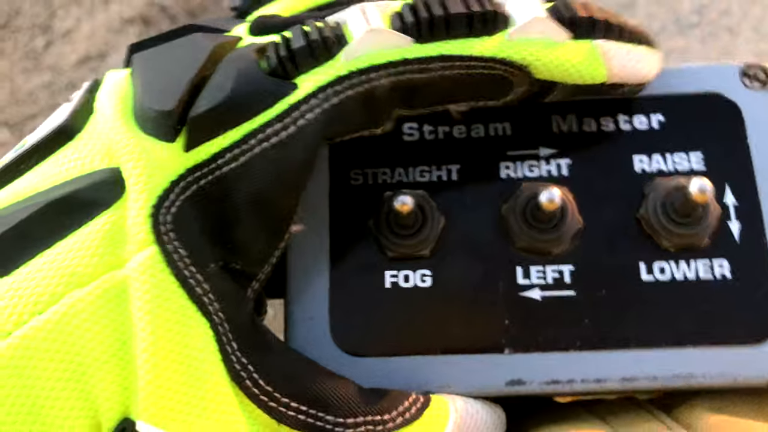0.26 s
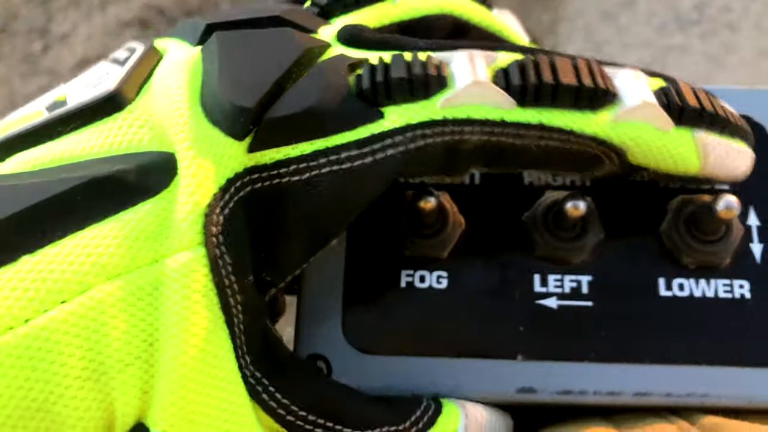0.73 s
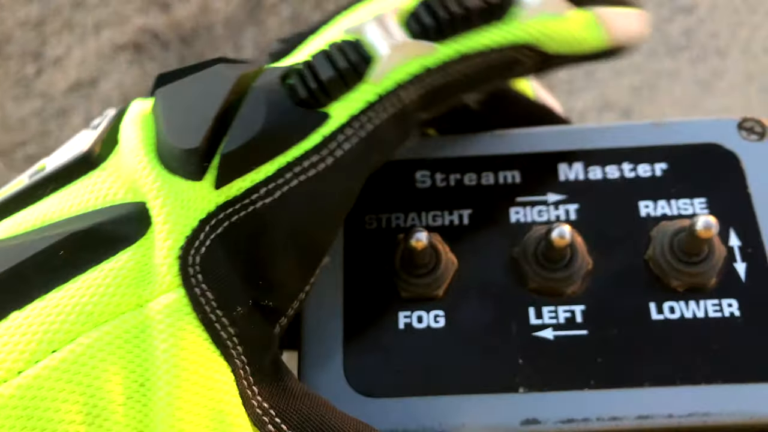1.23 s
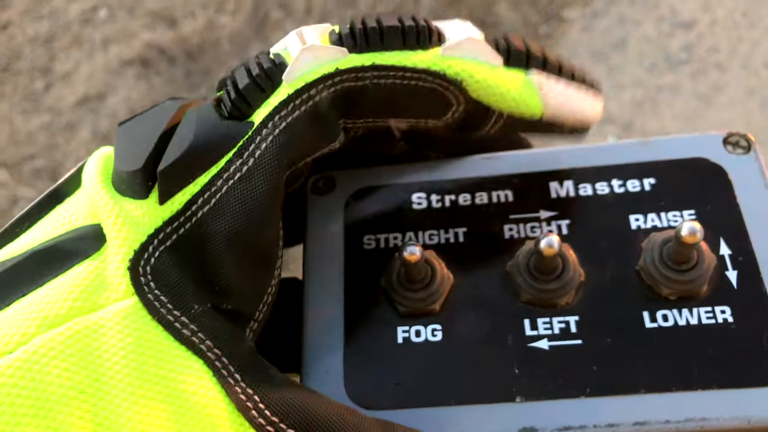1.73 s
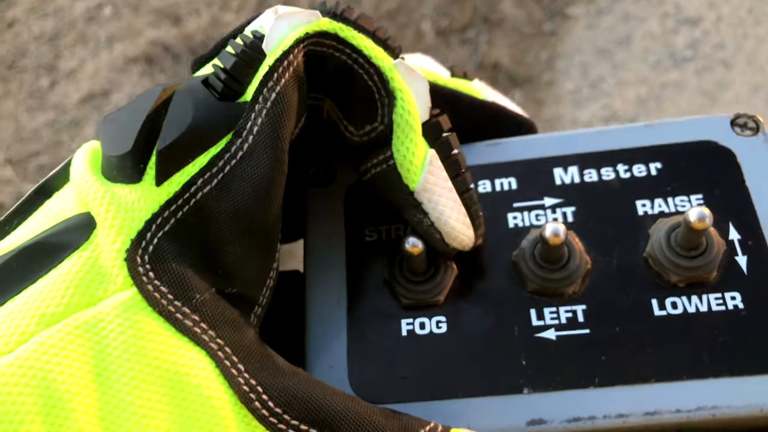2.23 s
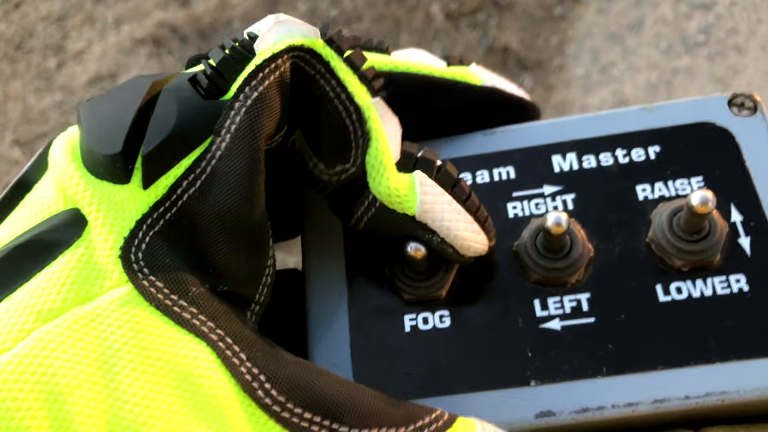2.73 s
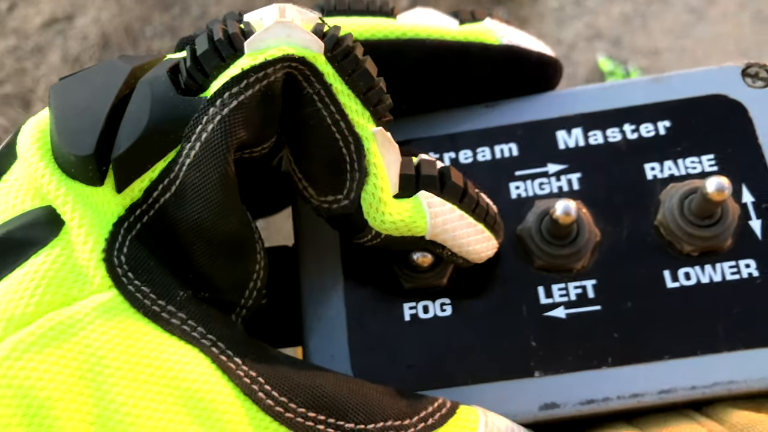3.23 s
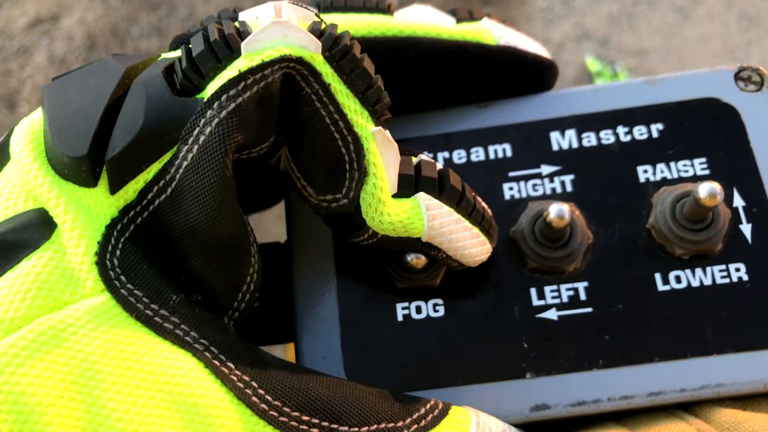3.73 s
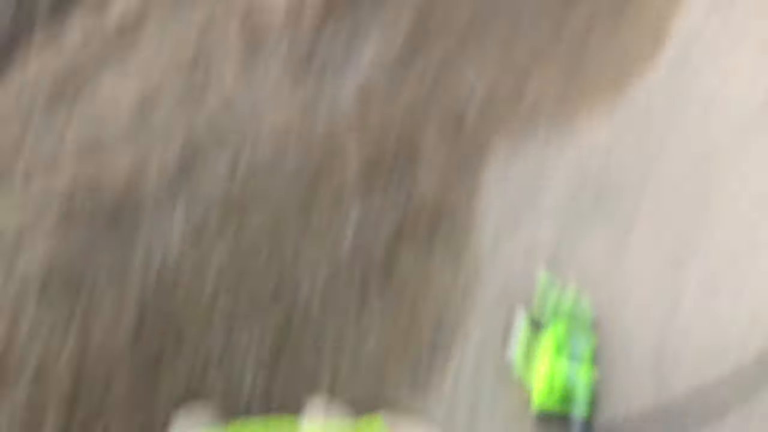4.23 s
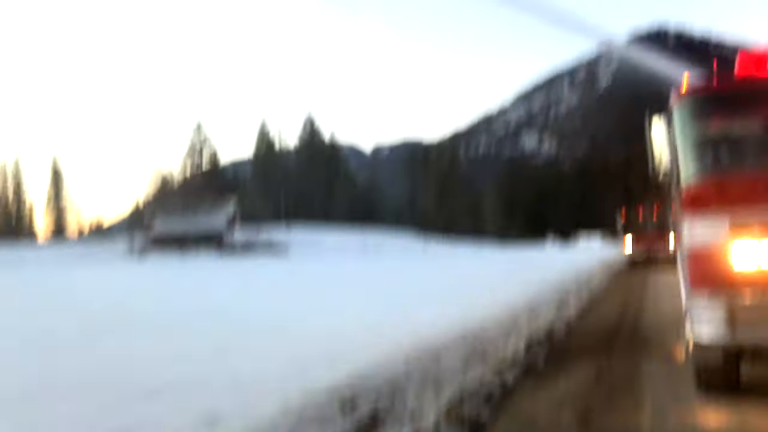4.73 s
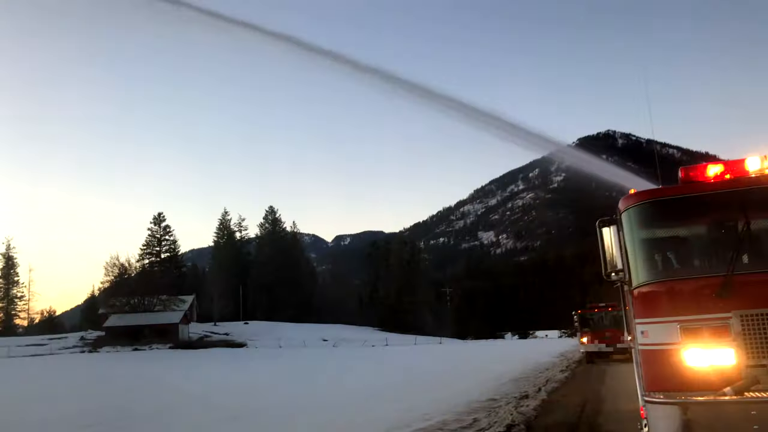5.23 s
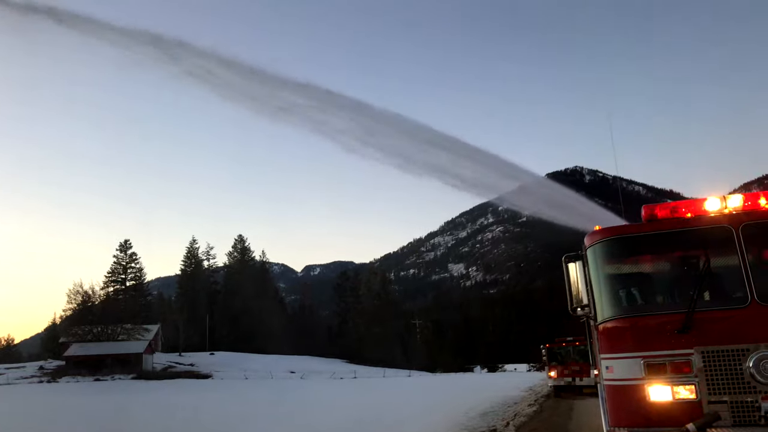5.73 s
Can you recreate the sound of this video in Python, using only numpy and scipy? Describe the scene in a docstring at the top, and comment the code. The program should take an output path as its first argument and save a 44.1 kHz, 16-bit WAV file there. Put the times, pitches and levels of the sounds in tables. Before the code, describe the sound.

Outdoors beside a fire engine, a diesel under constant load drones low and steady with a pump whine, fine mechanical clatter and rushing water hiss. A faint bright toggle click comes close by around three seconds. Just after four, the hand-held microphone swings toward the truck and the hiss grows stronger and brighter as the stream widens.

```python
"""In the open beside a six-cylinder diesel fire engine that drives its pump at steady speed.
A roof monitor throws a stream. Engine, pump and clatter notes are tones locked to the engine cycle;
weaker contacts are a repeating noise pattern; exhaust roar and water are shaped noise. The hand-held
microphone first points at the ground, then swings round to face the truck; treble grows as the stream widens.
A toggle switch clicks close by: one bright crack with a short ring."""
import sys
import numpy as np
from scipy import signal
from scipy.fft import rfft, irfft, next_fast_len
from scipy.io import wavfile
from scipy.ndimage import map_coordinates

SR = 44100
rng = np.random.default_rng(int(sys.argv[2]) if len(sys.argv) > 2 else 0)


def put_to_file(sound):
    """Save the sound as 16-bit audio at rate SR, in the file named by the first command-line argument."""
    columns = np.atleast_2d(sound).T  # one column per channel
    safe = np.clip(columns, -1, 1)
    whole_steps = np.round(safe * 32767)
    wavfile.write(sys.argv[1], SR, whole_steps.astype(np.int16))


N = 263277
TIME_S = np.arange(N) / SR
PAD = next_fast_len(N)
HZ = np.maximum(np.arange(PAD // 2 + 1) * SR / PAD, 1)   # frequency of each spectrum bin
CUTOFF_HZ = 15730   # top of the microphone's range

# mean firing rate, and how far it hunts (rms); a four-stroke cycle holds six firings
FIRING_HZ, HUNT_HZ, FIRINGS_PER_CYCLE = 101.96, .06, 6


def from_db(db):
    """Decibels to gain."""
    return 10 ** (np.asarray(db) / 20)


def at_hz(points, hz):
    """Read a table of (frequency, level) on a log-frequency axis."""
    table_hz, table_db = np.array(points).T
    return np.interp(np.log(hz), np.log(table_hz), table_db)


def drift(rate_hz):
    """Slow random wander of spread 1: noise through two equal low-pass poles at rate_hz."""
    step = 40   # samples between the points that are drawn
    r = np.exp(-2 * np.pi * rate_hz * step / SR)
    noise = rng.standard_normal(N // step + 2002)
    slow = signal.lfilter([1], [1, -2 * r, r * r], noise)[2000:]   # drop the filter's run-in
    return np.interp(np.arange(N) / step, np.arange(len(slow)), slow / slow.std())


def rise(at_s, width_s):
    """A smooth step from 0 to 1, halfway at at_s."""
    return .5 + .5 * np.tanh((TIME_S - at_s) / width_s)


def opened(hz):
    """How far this pitch has come out of the hand's shadow as the microphone swings, 0 to 1."""
    # one pitch leaves first, lower and higher ones follow
    first_hz, first_s, swing_s = 3300, 4.3, .24
    lag_down_s_per_octave, lag_up_s_per_octave = .034, .05
    octaves = np.log2(hz / first_hz)
    lag_s = max(lag_up_s_per_octave * octaves, -lag_down_s_per_octave * octaves)
    return rise(first_s + lag_s, swing_s)


def tone(order, cycle, level_db, waver_db, blur_rad):
    """One multiple of the engine cycle, wavering in level and phase around an rms level."""
    phase = 2 * np.pi * (order * cycle + rng.random()) + blur_rad * drift(3.0)
    return from_db(level_db + waver_db * drift(2.17)) * np.sqrt(2) * np.sin(phase)


def throb(cycle, alternate, each):
    """Level pulses with every second firing and with every firing."""
    every_second = np.cos(2 * np.pi * FIRINGS_PER_CYCLE / 2 * cycle)
    every = np.cos(2 * np.pi * FIRINGS_PER_CYCLE * cycle)
    return 1 + alternate * every_second + each * every


def colour(x, points, level_db):
    """Spectrum of x shaped by a table, silent below it and above the cutoff, at the given rms."""
    audible = (HZ > points[0][0]) & (HZ < CUTOFF_HZ * 1.05)
    shaped = rfft(x, PAD) * from_db(at_hz(points, HZ)) * audible
    return shaped * from_db(level_db) * PAD / np.sqrt(2 * np.sum(abs(shaped) ** 2))


def exhaust(cycle):
    """Uneven cylinders sound low orders of the engine cycle; the firing note is the steadiest."""
    # low engine orders: multiple_of_cycle, level_db (relative to the firing note)
    low_orders = [(4, -26), (5, -18), (6, 0), (7, -15), (8, -19), (9, -10), (10, -9.5), (12, -14.5),
                  (13, -34), (14, -28), (18, -15.5)]
    firing_note_db = -25
    out = 0
    for order, relative_db in low_orders:
        unsteady = order != FIRINGS_PER_CYCLE
        out = out + tone(order, cycle, firing_note_db + relative_db, 1.76 * unsteady, .54 * unsteady)
    return out


def pump(cycle):
    """Impeller vanes pass the casing tongue, geared to the engine; overtones are less steady."""
    # vane note and overtones: multiple_of_vane_note, level_db (relative to the vane note)
    overtones = [(1, 0), (2, -9), (3, -18.5), (4, -23)]
    vanes_per_firing, away_db, facing_db = 1.8512, -26.5, -28
    vanes_per_cycle = FIRINGS_PER_CYCLE * vanes_per_firing
    level_db = away_db + (facing_db - away_db) * opened(FIRING_HZ * vanes_per_firing)
    out = 0
    for k, relative_db in overtones:
        out = out + tone(k * vanes_per_cycle, cycle, level_db + relative_db, .6 * k, .1 * (k - 1))
    return out


def clatter(cycle):
    """Valves and pistons repeat their contacts every cycle, so the clatter is a comb of tones."""
    # strongest tones of the clatter: multiple_of_cycle, turned_away_db, facing_db
    comb = [(39, -47, -51), (41, -50, -55), (48, -50, -52), (49, -48, -50), (51, -52, -50), (56, -52, -54),
            (57, -51, -55), (60, -53, -50), (61, -51, -56), (63, -48, -48), (64, -48, -56), (66, -50, -48),
            (67, -53, -58), (68, -54, -49), (69, -59, -52), (70, -52, -58), (73, -52, -50), (75, -49, -52),
            (77, -56, -54), (78, -48, -54), (80, -53, -61), (82, -51, -55), (89, -56, -55), (97, -58, -56),
            (113, -61, -62), (118, -61, -63), (153, -66, -61), (164, -66, -56), (231, -72, -63),
            (241, -70, -63)]
    out = 0
    for order, away_db, facing_db in comb:
        level_db = away_db + (facing_db - away_db) * opened(order * FIRING_HZ / FIRINGS_PER_CYCLE)
        out = out + tone(order, cycle, level_db, waver_db=2.2, blur_rad=1.1)
    return out


def contacts(cycle, change_rate_hz):
    """Weaker contacts ring in the block every cycle; two patterns blend slowly at constant power."""
    # colour of the ringing block: frequency_hz, level_db (per Hz)
    block_ring = [(450, -19), (600, -0.5), (900, -20), (1400, -2), (1700, -6), (2500, -20), (4500, -29)]
    steps = 2600   # points of the pattern in one engine cycle
    step = (cycle % 1 * steps).astype(int)
    blend_rad = drift(change_rate_hz)
    first = rng.standard_normal(steps)[step]
    second = rng.standard_normal(steps)[step]
    knocks = np.cos(blend_rad) * first + np.sin(blend_rad) * second
    return np.array([colour(knocks, block_ring, -45), colour(knocks, block_ring, -46.5)])   # away, facing


def roar(cycle):
    """Turbulent exhaust, fan and block noise, pulsing with the firings: spectra away and facing."""
    # colour with the microphone turned away, then facing: frequency_hz, level_db (per Hz)
    roar_away = [(15, -57), (25, -32), (48, -18), (67, -9.5), (85, -6.5), (108, 1), (145, -5), (181, -2),
                 (206, -6.5), (238, -5), (377, -10), (487, -14.5), (564, -13.5), (1310, -21.5), (1700, -23),
                 (2000, -31.5), (2600, -39), (4400, -120)]
    roar_facing = [(15, -58), (25, -30), (48, -16), (75, -5), (103, 0.5), (140, -1.5), (191, -1),
                   (252, -9.5), (326, -9), (377, -8), (470, -11.5), (1110, -13), (2000, -32.5), (2600, -60),
                   (4400, -120)]
    noise = rng.standard_normal(N) * throb(cycle, alternate=.11, each=.016)
    return np.array([colour(noise, roar_away, -25.5), colour(noise, roar_facing, -27)])


def spray(cycle):
    """Rushing water mixed with engine hiss, pulsing with the firings: spectra away and facing."""
    # colour with the microphone turned away, then facing: frequency_hz, level_db (per Hz)
    spray_away = [(1060, -5.5), (1800, -8.5), (2100, -6.5), (2280, 1), (2560, -1.5), (2960, -4),
                  (3740, -10.5), (4280, -4), (4850, -9), (6080, -9), (7760, -16), (9460, -19.5),
                  (10500, -22.5), (12900, -24.5), (15500, -44)]
    spray_facing = [(1060, -9), (1800, -0.5), (2190, -2.5), (2730, -1), (2960, -0.5), (3320, -2.5),
                    (3740, -6), (4240, -2.5), (4940, -10), (6900, -13), (7690, -15.5), (9630, -20.5),
                    (10400, -23), (12700, -23), (15500, -30)]
    noise = rng.standard_normal(N) * throb(cycle, alternate=.042, each=.043)
    return np.array([colour(noise, spray_away, -42.5), colour(noise, spray_facing, -37)])


def shelf(x, hz, gain_db):
    """Treble above hz follows a gain curve."""
    top = signal.sosfiltfilt(signal.butter(2, hz, "high", fs=SR, output="sos"), x)
    return x + (from_db(gain_db) - 1) * top


def fanned(x):
    """Mist and topmost air grow as the stream fans out, brightening the noise."""
    fan_from_s = 5
    mist_hz, mist_db_per_s = 7000, 2
    air_hz, air_db_per_s = 12500, 2.2
    since_s = np.maximum(TIME_S - fan_from_s, 0)
    flutter_db = .68 * drift(16)   # droplets come in bursts, before the fanning too
    misty = shelf(x, mist_hz, mist_db_per_s * since_s + flutter_db)
    return shelf(misty, air_hz, air_db_per_s * since_s)


def near_echo(x):
    """An echo off a close surface weakens pitches whose half wave fits the extra path once or thrice."""
    near_m, far_m, sway_m = .052, .306, .003   # extra path; the hand is never quite still
    lift = rise(4.39, .14)   # the path grows as the microphone is lifted away
    path_m = near_m + (far_m - near_m) * lift + sway_m * drift(.51)
    # strength at rest, stronger once the turn begins, then fading away
    rest, turning = .25, .5
    strength = rest + (turning - rest) * rise(4.13, .07)
    strength = strength * (1 - rise(4.47, .17))
    echo_band = signal.butter(1, (450, 5000), "band", fs=SR, output="sos")
    band = signal.sosfiltfilt(echo_band, x)
    delayed_at = np.arange(N) - SR * path_m / 343   # speed of sound in m/s
    return x + strength * map_coordinates(band, [delayed_at], order=3, mode="nearest")


def swung(away, facing):
    """Band by band, the sound passes from its shaded to its open colour."""
    out = irfft(away, PAD)[:N]
    centres_hz = np.geomspace(200, 14000, num=14)
    for k, hz in enumerate(centres_hz):
        # overlapping triangles on a log-frequency axis, adding up to 1
        band = np.interp(np.log(HZ), np.log(centres_hz), np.arange(len(centres_hz)) == k)
        out += opened(hz) * irfft((facing - away) * band, PAD)[:N]
    return out


def switch():
    """The toggle snaps over and bounces: a bright crack, and small parts that ring briefly."""
    # snaps: start_s (first contact 0.7 ms later), level_db (crack peak)
    snaps = [(2.9621, -32.5)]
    # ringing small parts: frequency_hz, level_db, t60_s
    ringing_parts = [(6900, 2, .008), (8900, -2, .012), (11600, -1, .006), (13800, -3, .005),
                     (15000, -3, .005)]
    clicks = np.full(N, 1e-18)
    for start_s, level_db in snaps:
        hits = round((start_s + .0007) * SR) + np.array([0, 31, 57])   # contact and two bounces
        clicks[hits] = from_db(level_db - 6) * np.array([1, -.7, .6])
    out = np.diff(clicks, 2, prepend=[0, 0])   # differencing twice leaves the bright crack
    for hz, level_db, t60_s in ringing_parts:
        r = from_db(-60 / (t60_s * SR))
        w = 2 * np.pi * hz / SR
        resonator = [1, -2 * r * np.cos(w), r * r]
        out = out + signal.lfilter([0, from_db(level_db) * np.sin(w)], resonator, clicks)
    return out


def scene():
    """Engine, pump and stream with the echo close to the microphone, and the switch."""
    firing_hz = FIRING_HZ + HUNT_HZ * drift(2)
    cycle = np.cumsum(firing_hz) / FIRINGS_PER_CYCLE / SR   # engine cycles completed so far
    tones = exhaust(cycle) + pump(cycle) + clatter(cycle)
    away, facing = contacts(cycle, change_rate_hz=2.5) + roar(cycle) + spray(cycle)
    noises = fanned(swung(away, facing))
    return (near_echo(tones + noises) + switch())[None]


def record(dry):
    """The microphone housing colours the sound with narrow dips and bumps; the top is cut."""
    # housing dips and bumps: centre_hz, width_hz, gain_db
    housing = [(487, 200, -1), (1045, 110, -1.5), (2970, 220, -4), (4330, 220, 1), (4900, 300, -2),
               (7740, 400, -3), (10500, 380, -4.5)]
    edge = 2048   # a mirrored run-in keeps both ends free of clicks
    long = np.pad(dry, [(0, 0), (edge, edge)], mode="reflect", reflect_type="odd")
    size = next_fast_len(long.shape[1])
    grid_hz = np.arange(size // 2 + 1) * SR / size
    housing_db = sum(db * np.exp(-2 * ((grid_hz - hz) / width_hz) ** 2) for hz, width_hz, db in housing)
    coloured = irfft(rfft(long, size) * from_db(housing_db), size)
    top_cut = signal.ellip(14, .3, 70, CUTOFF_HZ, fs=SR, output="sos")
    return signal.sosfilt(top_cut, coloured)[:, edge:edge + N]


dry = scene()
out = record(dry)
put_to_file(out)
```